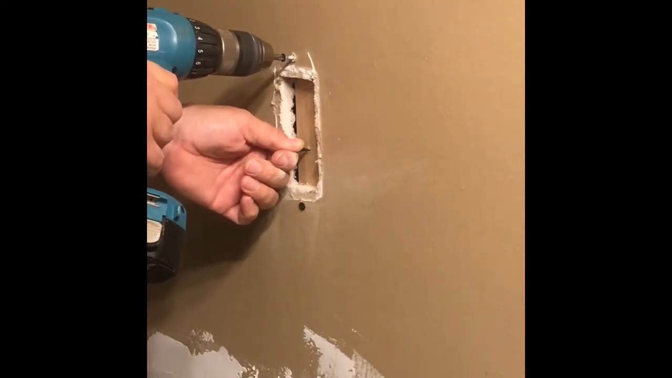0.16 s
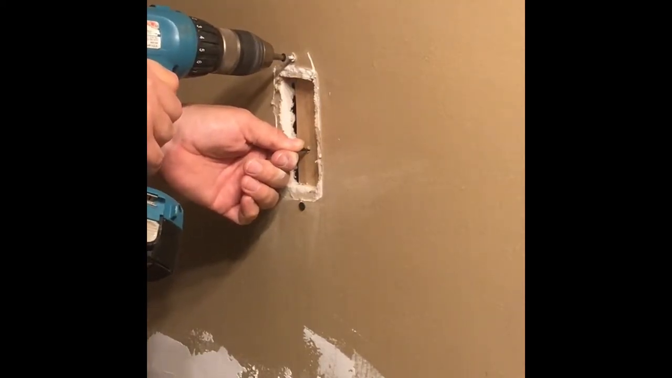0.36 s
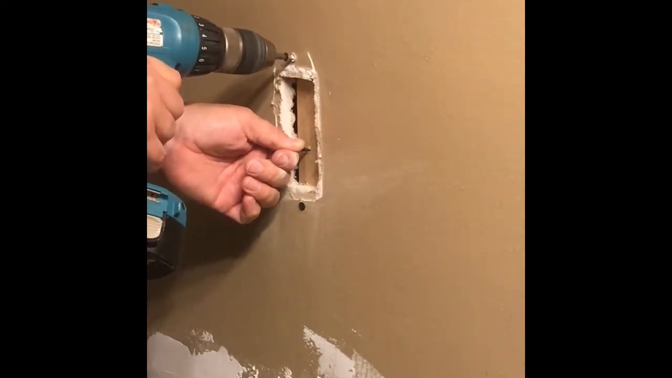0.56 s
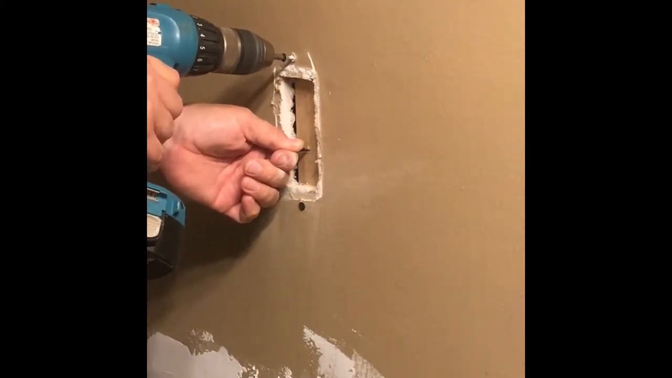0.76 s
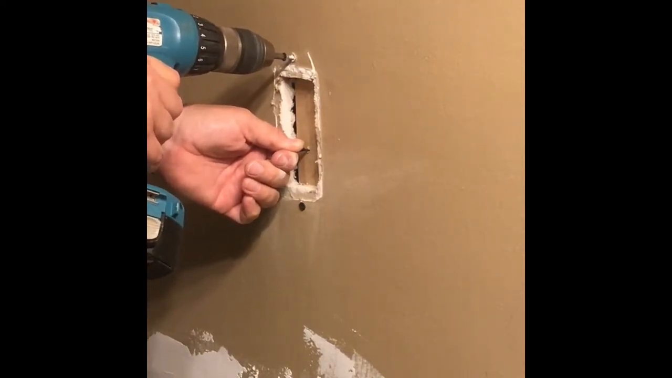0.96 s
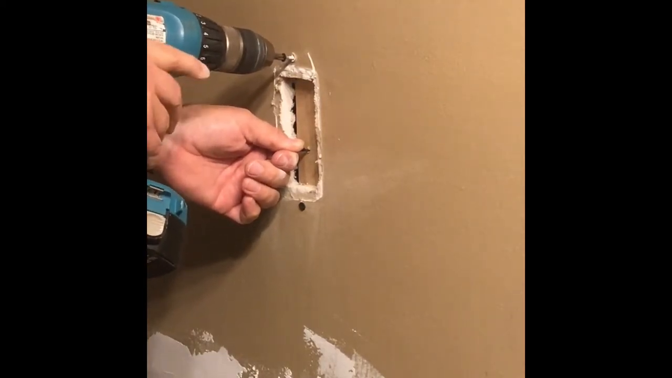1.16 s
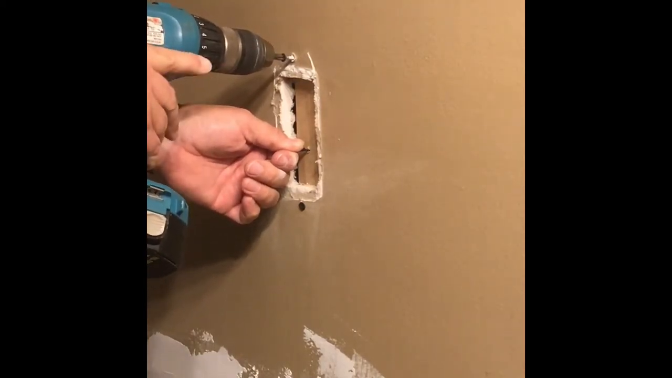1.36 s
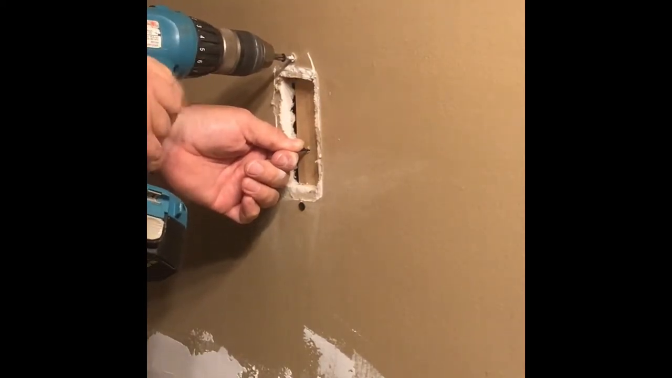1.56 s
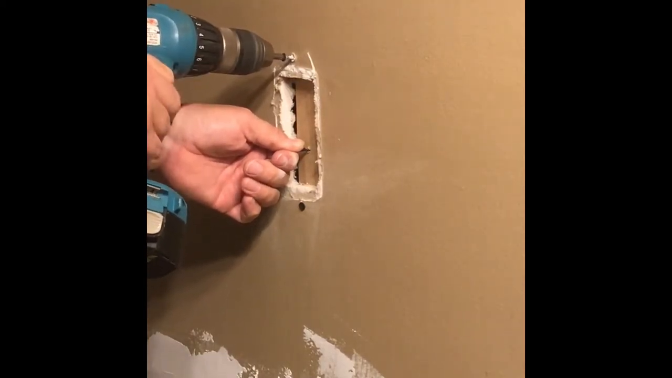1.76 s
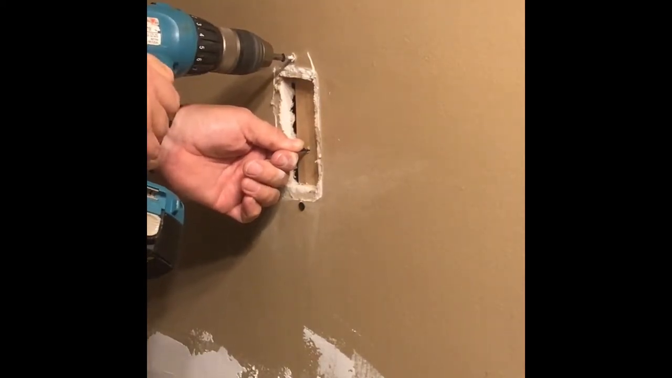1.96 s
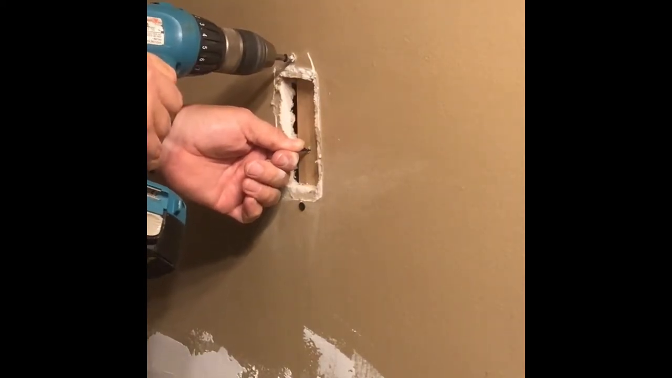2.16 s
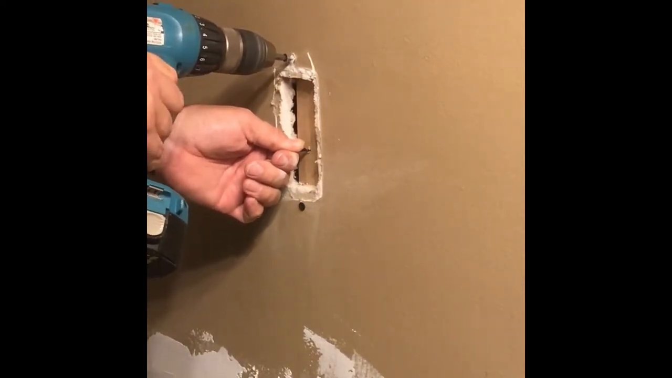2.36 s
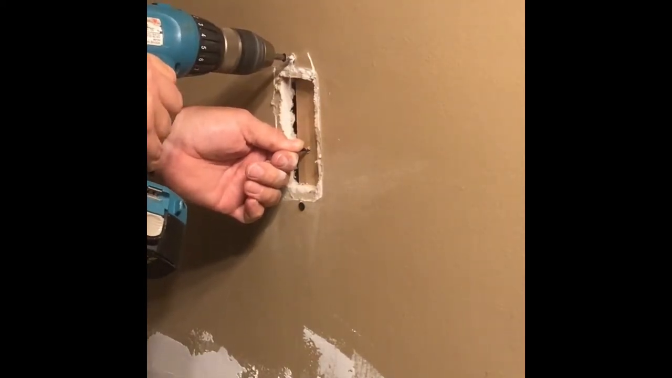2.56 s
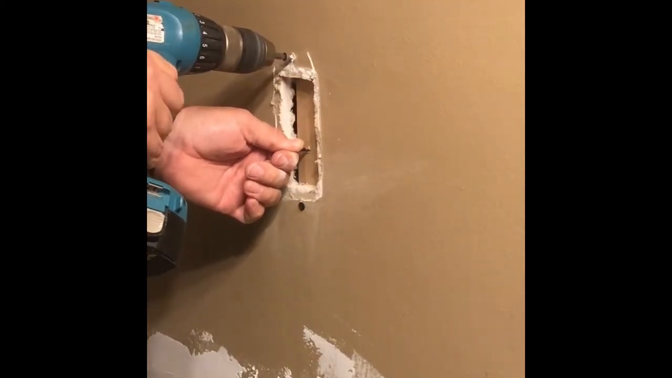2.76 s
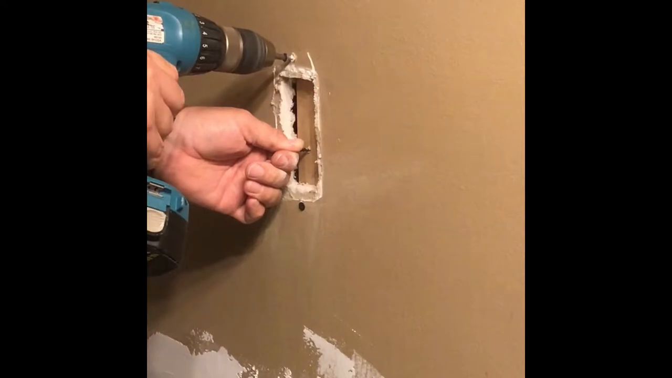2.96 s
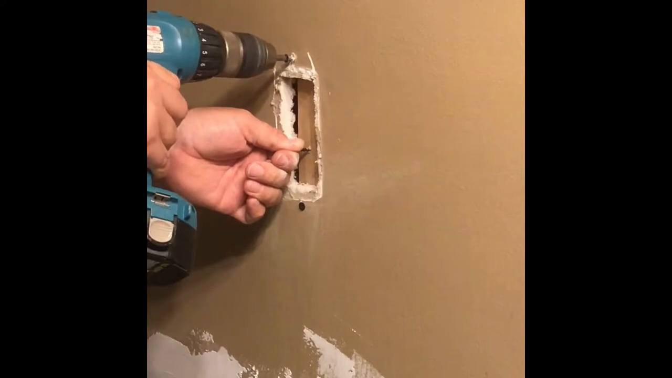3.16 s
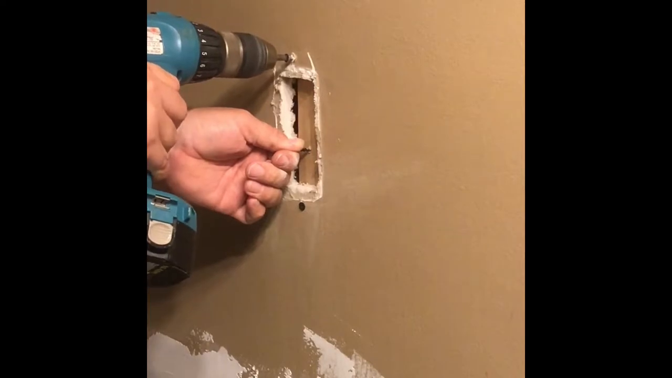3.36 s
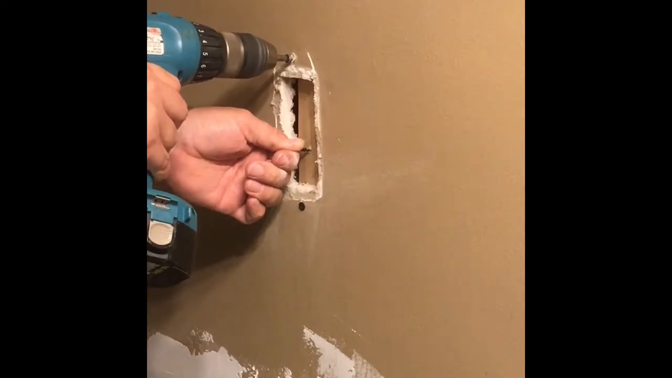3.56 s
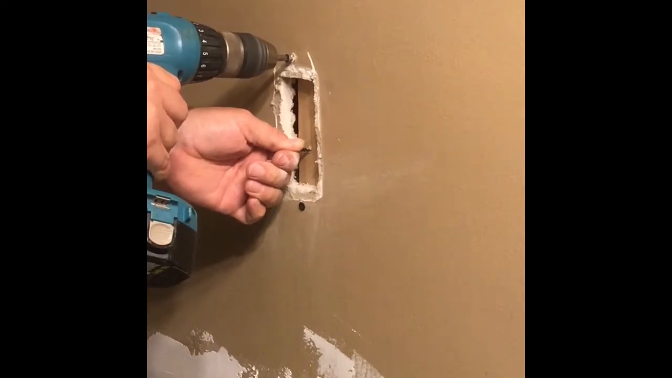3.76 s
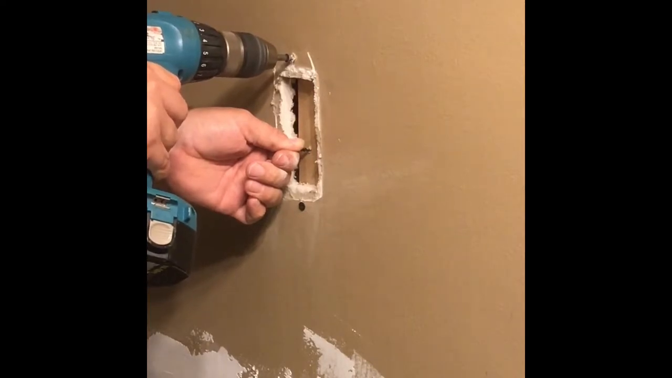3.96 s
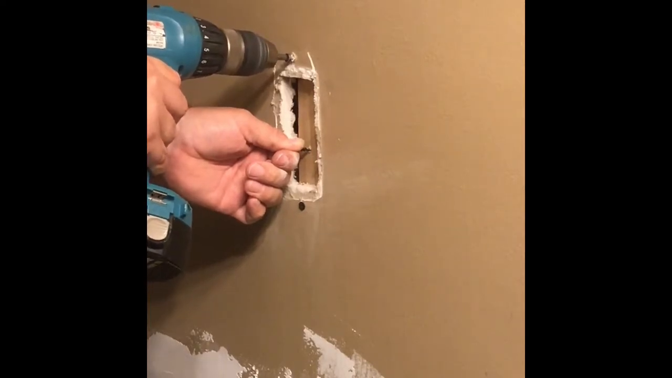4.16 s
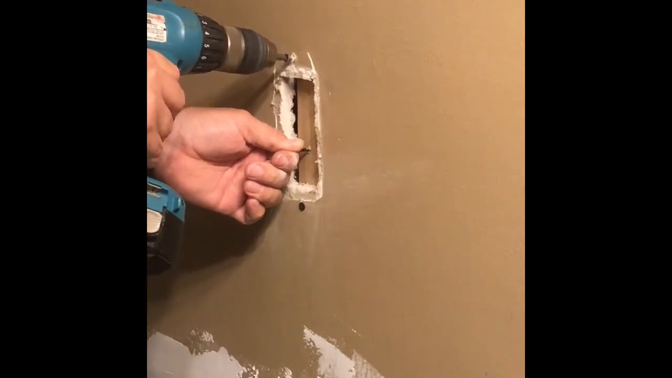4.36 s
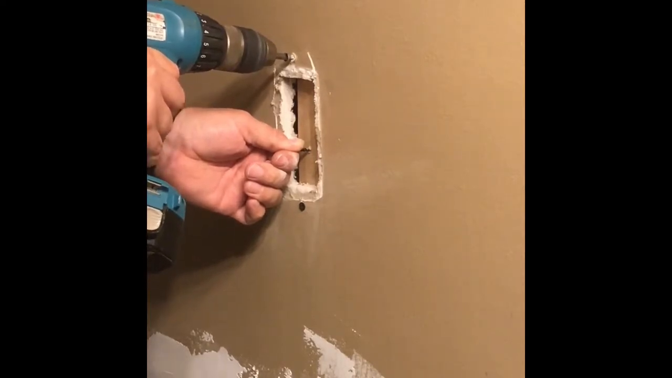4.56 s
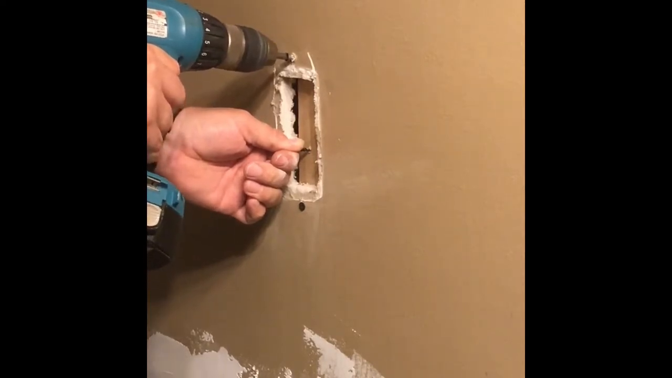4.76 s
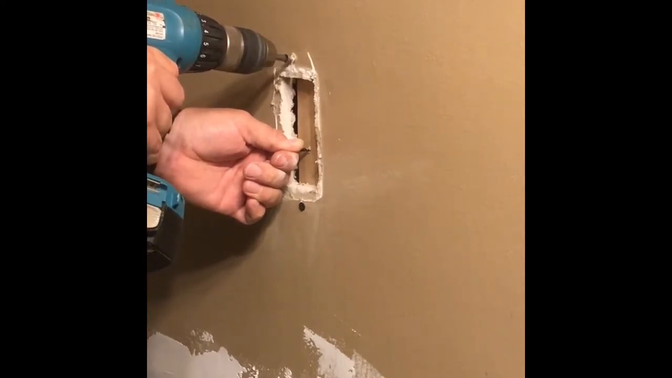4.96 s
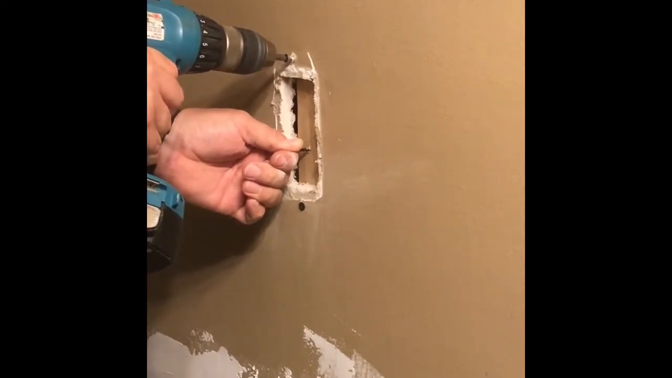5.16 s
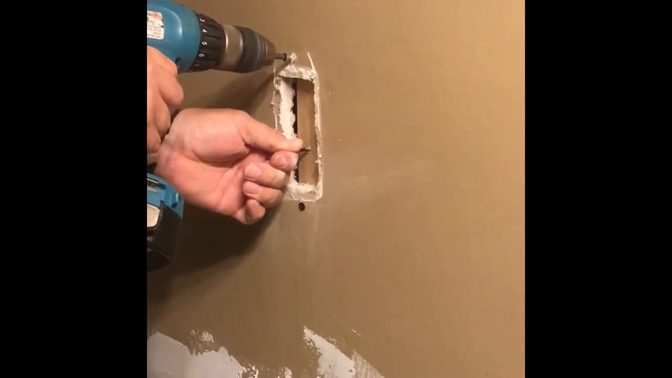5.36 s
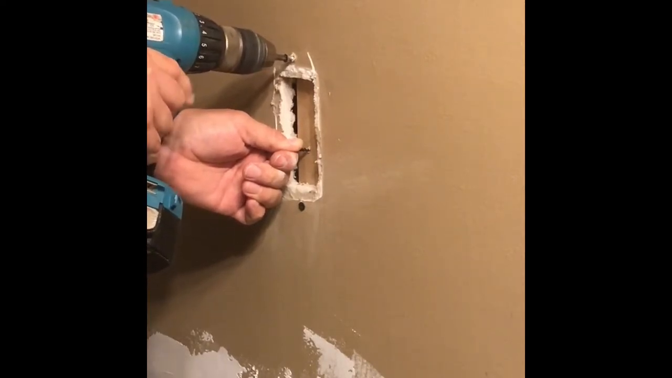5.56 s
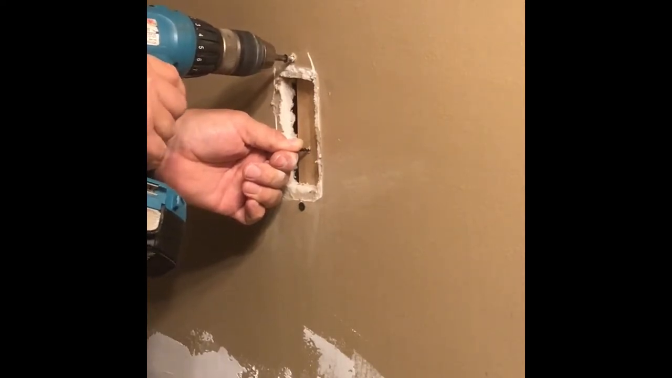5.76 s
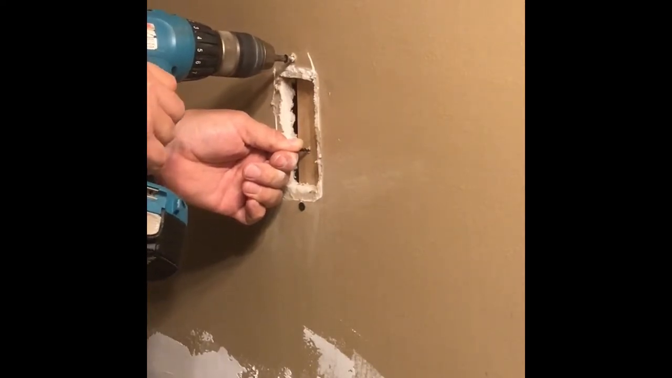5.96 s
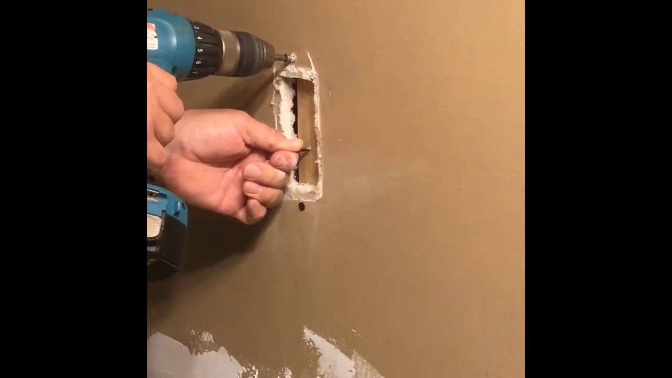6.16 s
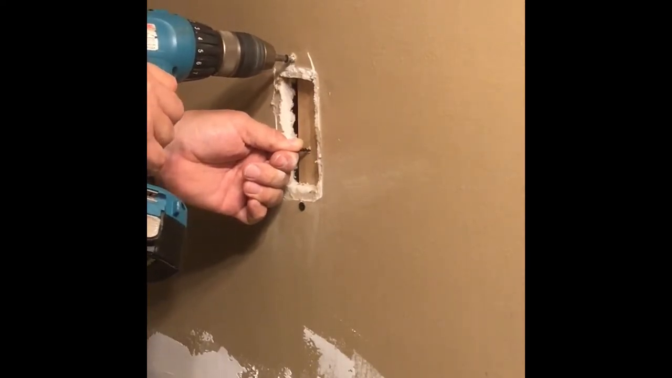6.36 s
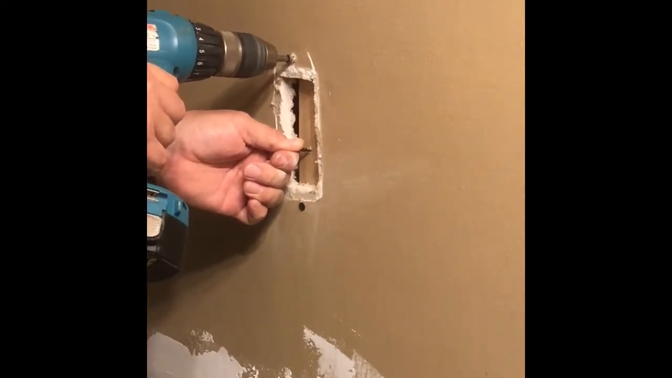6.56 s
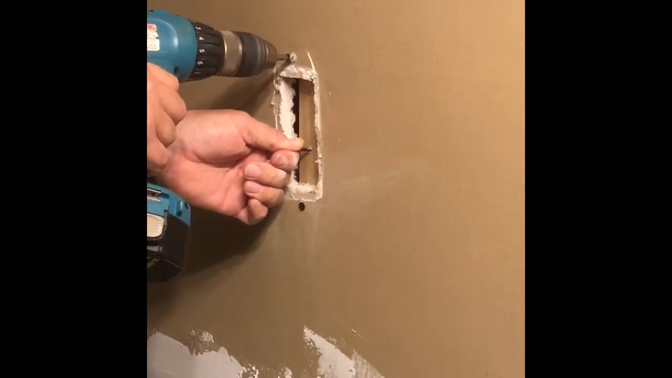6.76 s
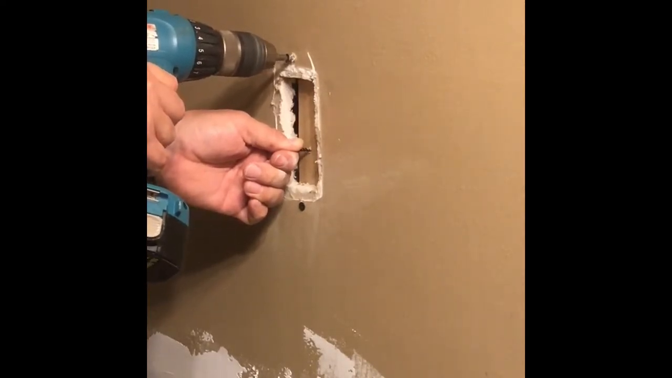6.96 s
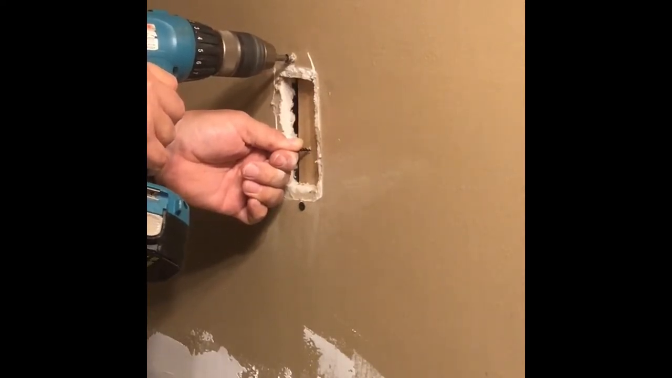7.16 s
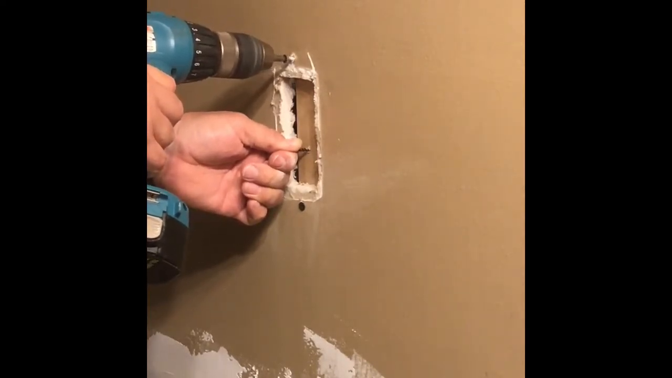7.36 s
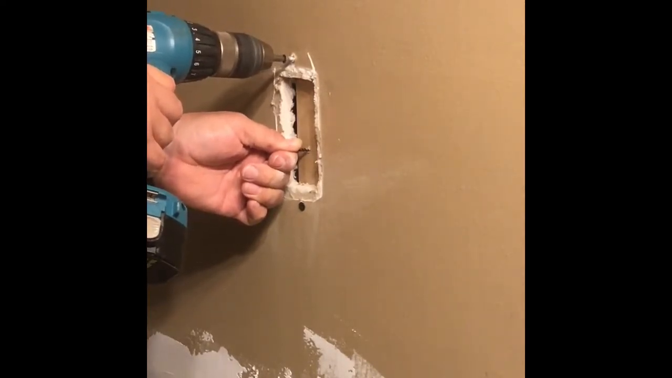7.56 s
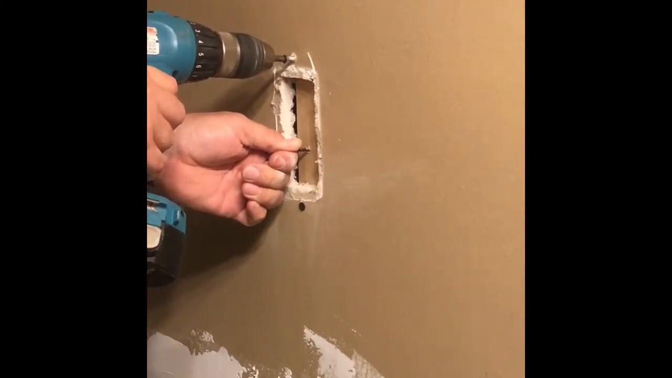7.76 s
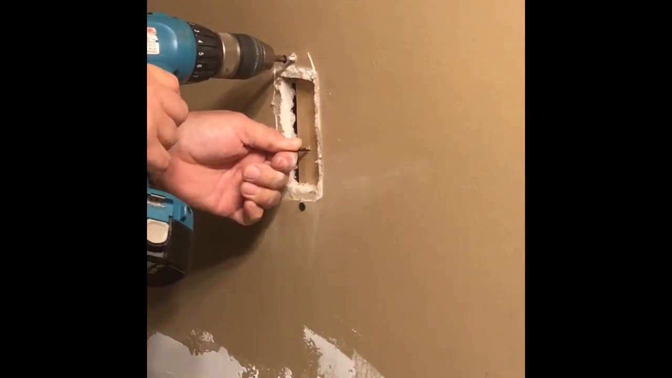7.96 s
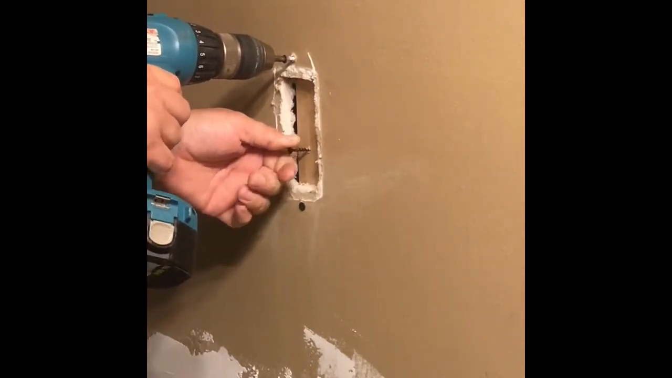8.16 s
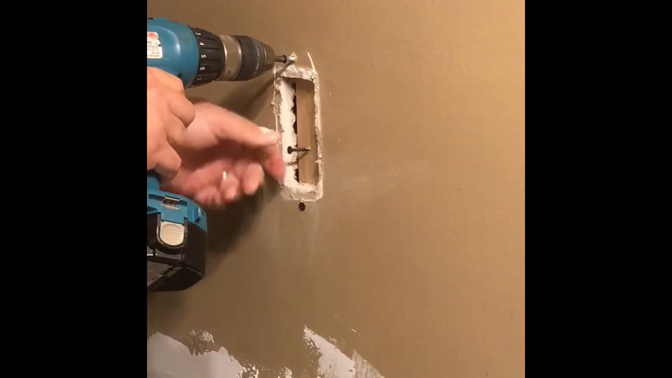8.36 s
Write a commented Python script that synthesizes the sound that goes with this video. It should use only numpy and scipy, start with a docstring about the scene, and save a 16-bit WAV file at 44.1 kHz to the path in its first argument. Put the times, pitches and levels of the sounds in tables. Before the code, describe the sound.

Close up in a small, hard room, a cordless drill turns slowly, clicks twice, then whines through two longer runs that stop abruptly.

```python
"""In a small bathroom, a cordless drill drives a screw through drywall into a stud: one slow try, two
snaps of its switch, then two long runs at full speed, each ended by the brake. The motor and gears whine
over the noise of the brushes and fan, the wall panel drums under the bit, and the hard room rings.
One close microphone hears it all."""
import sys
import numpy as np
from scipy import signal
from scipy.fft import rfft, irfft, next_fast_len
from scipy.io import wavfile
from scipy.ndimage import map_coordinates

SR = 44100
rng = np.random.default_rng(int(sys.argv[2]) if len(sys.argv) > 2 else 0)


def pcm_store(signal):
    """Save signal as 16-bit PCM."""
    levels = np.round(np.clip(np.atleast_2d(signal), -1, 1) * 32767)
    wavfile.write(sys.argv[1], SR, levels.astype(np.int16).T)


N = 370881

# Levels are relative within each table. A fade_s is the time a sound takes to drop by 60 dB.
# the quiet room's low rumble: pitch_hz, level_db
ROOM_TONE = [(15, -35.5), (25, -7), (53, 3.5), (144, -0.5), (174, -9), (222, -26), (291, -14), (15800, -39)]
# how long the room rings: pitch_hz, fade_s
ROOM_FADES = [(150, 0.5), (1000, 0.31), (3500, 0.34), (8000, 0.33), (15000, 0.24)]
# the microphone's uneven treble: pitch_hz, level_db
MIC_COLOUR = [(6900, 0.5), (7600, -1), (8400, 1.5), (9800, 0), (10450, -2.5), (11500, 0), (14300, -2),
              (15500, 1.5)]

# the chuck (the bit's clamp) rattles on braking, or the grip shifts: start_s, level_db, fade_s
RATTLES = [(0, -44.5, 0.13), (1.125, -30.5, 0.19), (1.722, -50.5, .3), (5.548, -27.5, 0.28),
           (7.83, -24, 0.21), (8.268, -55.5, .12)]
# the colour of that rattle: pitch_hz, level_db
RATTLE_COLOUR = [(150, 4.5), (400, -1.5), (800, 0), (1400, 4), (3200, -3.5), (6000, -7), (15000, -31)]
# snaps of the switch and trigger: start_s, level_db, brightness_hz
SWITCH_SNAPS = [(0.251, -42.5, 5000), (0.389, -34.5, 12000), (1.3135, -5.5, 13100), (1.317, -12.5, 12000),
                (1.408, -8, 5130), (1.782, -27, 9000), (6.035, -36, 15000), (6.064, -31, 9000),
                (8.189, -48, 15000)]
# where the drill's plastic shell rings: pitch_hz, width_hz, level_db
SHELL_RINGS = [(1696, 360, -2), (3365, 220, 5.5), (4600, 770, -3), (5300, 610, -3), (6700, 530, -2),
               (8730, 1300, -6), (14100, 1400, -4.5)]

# where the wall panel rings: pitch_hz, width_hz, level_db
WALL_RINGS = [(34, 6.6, -11.5), (58, 8, 0.5), (99.6, 9.2, 1), (116.3, 9, -2.5), (135.8, 9.5, -1.5),
              (167, 15.3, 0), (195.6, 6.7, 1.5), (217.4, 14, -5), (280, 16.2, -7), (351, 27.4, -13.5)]
# how hard the bit pushes on the wall, as the loudness of its boom: time_s, level_db
BIT_PUSH = [(0.58, -28), (0.95, -37.5), (1.85, -39), (1.98, -31.5), (2.6, -43.5), (3.2, -34), (3.8, -46.5),
            (4.1, -37), (4.38, -39.5), (4.65, -32), (5.03, -35), (5.3, -30), (6.18, -38.5), (6.45, -27.5),
            (6.74, -42), (6.9, -33.5), (7.3, -44), (7.8, -36.5)]
# the hand bumps the wall: start_s, level_db, fade_s
HAND_BUMPS = [(0, -37.5, 0.32), (1.11, -40.5, 0.46), (1.44, -40.5, 0.45)]

# pulls of the trigger: start_s, release_s, spin_up_s, level_db
TRIGGER_PULLS = [(0.384, 1.14, 0.075, -28.5), (1.774, 5.57, 0.079, -29), (6.054, 7.848, 0.067, -29)]
# the speed the trigger allows, eased and pressed again in the slow try: time_s, turns_per_s
TRIGGER_SPEED = [(.73, 148), (.85, 100), (.93, 66), (1.05, 101), (1.12, 106), (1.77, 205.5), (3.1, 205),
                 (3.8, 203.2), (5.2, 202.2), (7.8, 203.6)]
# the colour of the brushes, fan and gears: pitch_hz, level_db
WHIRR_COLOUR = [(180, -44.5), (300, -13.5), (798, -15.5), (1040, -7.5), (1330, -7), (1400, -6.5),
                (1500, -5.5), (1890, -9.5), (2160, -2.5), (2420, -4.5), (4190, -3.5), (4870, -7),
                (5840, -4), (10600, -14), (15800, -12)]
# where the gearbox rings: pitch_hz, width_hz, level_db
GEARBOX_RINGS = [(1574, 220, -1.5), (2160, 300, 2), (3100, 500, -6)]
# the tone of gear teeth meeting, and its overtones: pitch_multiple, level_db
TOOTH_TONES = [(1, 0), (2, 1), (3, -5)]
# fainter tones of the spinning shaft: cycles_per_turn, level_db
SHAFT_TONES = [(8, -25), (11, -23.5), (14, -19.5), (15.1, -16.5), (20.12, -27.5), (21, -17.5), (23, -20),
               (26, -16.5), (29, -26), (34, -23), (42, -24), (48, -26.5), (49, -24), (65, -25), (70, -28)]
# the whine of the commutator (the motor's spinning contacts): time_s, level_db
MOTOR_WHINE = [(2.1, -41.5), (3.1, -59), (3.45, -41), (4.6, -45), (5.5, -44), (6.35, -38.5), (7.35, -38.5),
               (7.8, -40.5)]
# the whine of the gear teeth: time_s, level_db
GEAR_WHINE = [(2.05, -41), (3.11, -46), (3.26, -38), (4.42, -52), (4.97, -35.5), (5.5, -43.5),
              (6.35, -38.5), (6.728, -43), (6.842, -33), (7.156, -48), (7.8, -42)]
# high whistles at 4 and 5 times the commutator's pitch: time_s, fourth_db, fifth_db
HIGH_WHISTLES = [(2.7, -42, -48), (3.45, -47, -44), (3.9, -34.5, -41), (4.3, -37, -41), (4.9, -49, -39.5),
                 (6.6, -40.5, -42), (7.6, -40.5, -40.5)]

TEETH_PER_TURN, CONTACTS_PER_TURN = 10.41, 7  # gear teeth and commutator contacts per shaft turn
BRAKE_FADE_S = 0.059
LOAD_DB, LOAD_TURNS_PER_S2 = 2.5, 230  # the gears' extra bite when speeding up about this fast or more
TOP_HZ = 15800


def amp(db):
    """Turn decibels into a gain."""
    return 10 ** (np.asarray(db) / 20)


def unit(x):
    """Scale x to an average (rms) strength of 1."""
    return x / np.sqrt(np.mean(x ** 2) + 1e-20)


def along(points, hz):
    """Read between (pitch_hz, value) points on a musical (log) scale."""
    pitches, values = np.transpose(points)
    return np.interp(np.log(hz + 1), np.log(pitches + 1), values)


def curves(rows):
    """Give one value per sample for each column after the time."""
    times, *columns = np.transpose(rows)
    return np.array([np.interp(np.arange(N) / SR, times, column) for column in columns])


def noise():
    """White noise: an even hiss."""
    return rng.standard_normal(N)


def wobble(rate):
    """A smooth curve through rate random values a second."""
    return map_coordinates(rng.standard_normal(int(N * rate / SR) + 4), [np.arange(N) * rate / SR])


def pattern(turns, count):
    """A random shape, made of count waves, that repeats every turn."""
    shape = unit(irfft(np.r_[0, np.exp(2j * np.pi * rng.random(count))], 2 ** 12))
    return np.interp(turns, np.arange(len(shape)) / len(shape), shape, period=1)


def tone(turns, per_turn, flutter_db=2.0, drift_db=3):
    """A tone tied to the shaft's turning; its level flutters fast and drifts slowly."""
    wave = np.sqrt(2) * np.sin(2 * np.pi * (per_turn * turns + rng.random()))
    return wave * unit(amp(flutter_db * wobble(45) + drift_db * wobble(3.025)))


def bursts(rows, rise_s=0.004):
    """A loudness curve of quick swells that die away."""
    level = np.zeros(N)
    for start_s, db, fade_s in rows:
        age = np.maximum(np.arange(N) / SR - start_s, 0)
        level += (1 - np.exp(-age / rise_s)) * amp(db - 60 * age / fade_s)
    return level


def lag(x, seconds):
    """Follow x sluggishly."""
    keep = np.exp(-1 / (seconds * SR))
    return signal.lfilter([1 - keep], [1, -keep], x)


def filtered(x, response):
    """Scale each pitch in x by response(hz)."""
    size = next_fast_len(N + SR // 2)
    return irfft(rfft(x, size) * response(np.fft.rfftfreq(size, 1 / SR)), size)[:N]


def coloured(x, colour):
    """Shape x by (pitch_hz, level_db) points, at strength 1."""
    return unit(filtered(x, lambda hz: amp(along(colour, hz))))


def treble(x, corner_hz):
    """Keep the highs of x, fading out gently below the corner."""
    return filtered(x, lambda hz: hz ** 2 / (hz ** 2 + corner_hz ** 2))


def resonate(x, rings):
    """Pass x through an object that rings at certain pitches."""
    return filtered(x, lambda hz: sum(
        (-1) ** k * amp(db) * 1j * hz * width / (pitch ** 2 - hz ** 2 + 1j * hz * width)
        for k, (pitch, width, db) in enumerate(rings)))


def room_tone():
    """The quiet room rumbles faintly."""
    return amp(-58.5) * coloured(noise(), ROOM_TONE)


def room(x, echo_db, stretch=1):
    """Hard walls add an echo that lasts longest in the bass; stretch scales its length."""
    hz, t, hiss = signal.stft(rng.standard_normal(SR // 2), SR, nperseg=256)
    fade_s = stretch * along(ROOM_FADES, hz)[:, None]
    tail = signal.istft(hiss * amp(-60 * t / fade_s), SR, nperseg=256)[1]
    delayed = np.pad(x, (SR // 400, 0))
    echo = signal.fftconvolve(delayed, tail / np.linalg.norm(tail))[:N]
    return (x + amp(echo_db) * echo) / np.hypot(1, amp(echo_db))


def clatter():
    """Loose metal parts rattle unevenly for a moment."""
    rattle = coloured(noise() * amp(5.4 * wobble(250)), RATTLE_COLOUR)
    return room(rattle * bursts(RATTLES), echo_db=-6)


def snaps(fade_s=0.011):
    """Each snap is a short crack, with its own brightness, that rings the plastic shell."""
    t = np.arange(SR // 20) / SR
    cracks = np.zeros(N + SR)
    for start_s, db, brightness_hz in SWITCH_SNAPS:
        soften = signal.butter(2, brightness_hz, fs=SR)
        crack = amp(db - 60 * t / fade_s) * rng.standard_normal(len(t))
        cracks[round(start_s * SR):][:len(t)] += signal.lfilter(*soften, crack)
    clicks = amp(5) * resonate(cracks[:N], SHELL_RINGS) + amp(-27) * treble(cracks[:N], corner_hz=1500)
    return room(clicks, echo_db=-2, stretch=0.86)


def wall(speed, running, boom_hz=68.2):
    """The turning bit and bumps of the hand make the drywall boom and rumble like a drum."""
    boom = np.sqrt(2) * np.sin(2 * np.pi * boom_hz * np.arange(N) / SR + 0.86 * wobble(13))
    boom *= amp(1.2 * wobble(18))
    catching = noise() * amp(2.7 * wobble(35))  # the bit catches unevenly
    rumble = unit(resonate(catching, WALL_RINGS))
    rumble = filtered(rumble, lambda hz: 1 / (1 + (hz / 600) ** 4))  # keep the lows
    shaking = running * (speed / speed.max()) ** 2.5
    push_db = curves(BIT_PUSH)[0]
    rumble_db = -40.5 + 0.56 * (push_db - push_db.mean())
    bumps = bursts(HAND_BUMPS, rise_s=0.0045)
    # the panel takes a moment to swell and to settle
    boom_level = lag(shaking * amp(push_db - 2.4), seconds=0.07) + bumps
    rumble_level = lag(shaking * amp(rumble_db), seconds=0.05) + amp(-19) * bumps + amp(-64.5)
    return boom_level * boom + rumble_level * rumble


def motor():
    """Each pull spins the shaft up; on release the brake fades running (0 to 1) and level away."""
    t = np.arange(N) / SR
    spun_up, running, level = np.zeros((3, N))
    for start_s, release_s, spin_up_s, db in TRIGGER_PULLS:
        age = np.maximum(t - start_s, 0)
        held = (age > 0) * amp(-60 * np.maximum(t - release_s, 0) / BRAKE_FADE_S)
        spun_up = np.where(age > 0, 1 - np.exp(-age / spin_up_s), spun_up)
        running += held
        level += amp(db) * held
    return spun_up * curves(TRIGGER_SPEED)[0], running, level


def brushes(turns, pace):
    """The motor's brushes scrape and spark at the same spots every turn: pulsing noise and a buzz."""
    scrape = coloured(noise() * amp(1.85 * pattern(turns, count=14)), WHIRR_COLOUR)
    dullness = np.clip(1.14 * (1 - pace), 0, 1)  # slower is duller
    whirr = scrape - dullness * treble(scrape, corner_hz=5930)
    buzz = coloured(pattern(turns, count=78), WHIRR_COLOUR)
    return amp(-1) * whirr + pace ** 2 * (amp(-18.5) * buzz + amp(-15) * treble(buzz, corner_hz=9000))


def gears(turns, pace):
    """Below full speed the loose gear teeth rattle; they and the commutator sound through the gearbox."""
    teeth = sum(amp(db) * tone(turns, k * TEETH_PER_TURN, drift_db=1) for k, db in TOOTH_TONES)
    commutator = amp(-3) * tone(turns, CONTACTS_PER_TURN, drift_db=1)
    uneven_contact = unit(amp(2.8 * wobble(260)))
    rattle = treble((teeth + commutator) * uneven_contact, corner_hz=1100)
    return np.sqrt(1 - pace) * pace * (amp(-4) * resonate(rattle, GEARBOX_RINGS) + amp(-5) * rattle)


def whines(turns):
    """The commutator and gear teeth sing at full speed; small circling gears make the gear tone pulse."""
    motor_level, gear_level = amp(curves(MOTOR_WHINE)[0] + 0.3), amp(curves(GEAR_WHINE)[0])
    fourth_level, fifth_level = amp(curves(HIGH_WHISTLES))
    circling = 1 + 0.25 * pattern(turns * 0.335, count=2)
    whistle = amp(-1) * tone(turns, 4 * CONTACTS_PER_TURN, drift_db=1.5)
    whistle += amp(-8) * tone(turns, per_turn=26, drift_db=2.5)  # a weaker tone just below
    return (motor_level * tone(turns, CONTACTS_PER_TURN, flutter_db=0, drift_db=0.9)
            + gear_level * circling * tone(turns, TEETH_PER_TURN, flutter_db=1.5, drift_db=1)
            + fourth_level * whistle
            + fifth_level * tone(turns, 5 * CONTACTS_PER_TURN, drift_db=-1.5))


def drill(speed, running, pull_level):
    """Every part follows the shaft; the brushes and gears throb with each turn of the chuck."""
    turns = np.cumsum(speed * (1 + 0.000474 * wobble(25) + 0.00149 * wobble(160))) / SR
    chuck_turns = turns / 19.55  # geared down
    pace = speed / speed.max()  # 1 at full speed
    level = pull_level * pace ** 0.4  # faster is louder
    speeding_up = np.tanh(np.gradient(speed) * SR / LOAD_TURNS_PER_S2)
    load = amp(LOAD_DB * lag(speeding_up, seconds=0.018))
    throb = amp(0.76 * pattern(chuck_turns, count=6) + 0.52 * wobble(30))
    # high powers of pace let a sound through only near full speed
    overtones = pace ** 6 * sum(amp(db) * tone(turns, per_turn) for per_turn, db in SHAFT_TONES)
    whirr = room(level * throb * brushes(turns, pace), echo_db=-6.5)
    growl = room(level * load * throb * gears(turns, pace), echo_db=-2.5)
    return whirr + growl + level * overtones + running * pace ** 16 * whines(turns)


def scene():
    """All the sounds reach one microphone, heard in both channels."""
    speed, running, level = motor()
    mono = drill(speed, running, level) + wall(speed, running) + snaps() + clatter() + room_tone()
    return np.array([mono, mono])


def record(dry):
    """The microphone colours the treble, and everything above TOP_HZ is cut."""
    return np.array([filtered(channel, lambda hz: amp(along(MIC_COLOUR, hz)) * (hz < TOP_HZ))
                     for channel in dry])


dry = scene()
out = record(dry)
pcm_store(out)
```